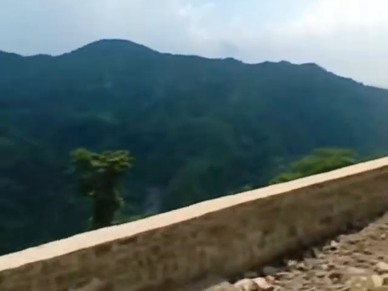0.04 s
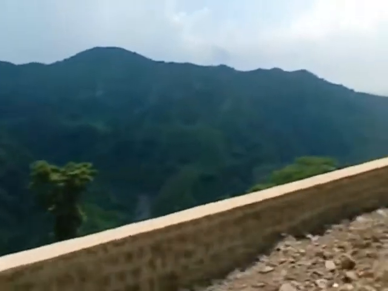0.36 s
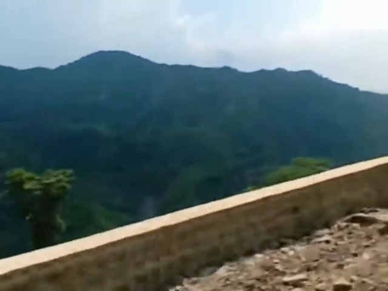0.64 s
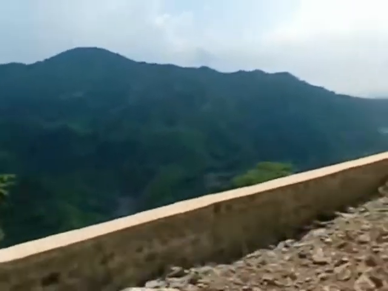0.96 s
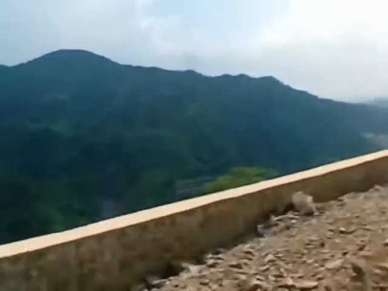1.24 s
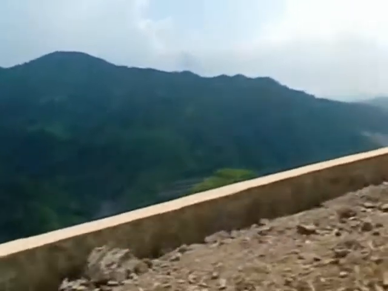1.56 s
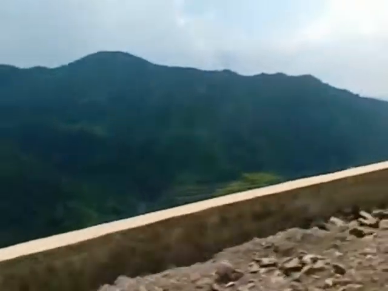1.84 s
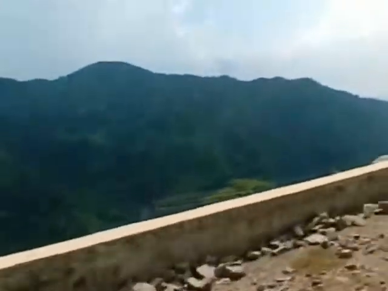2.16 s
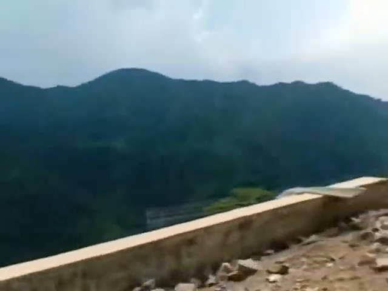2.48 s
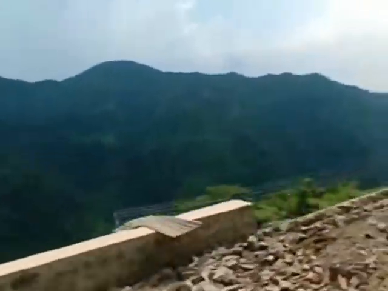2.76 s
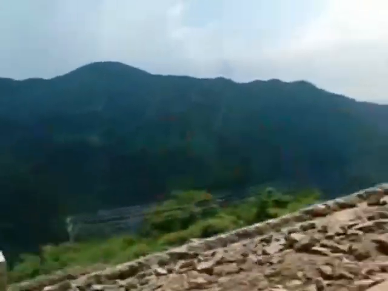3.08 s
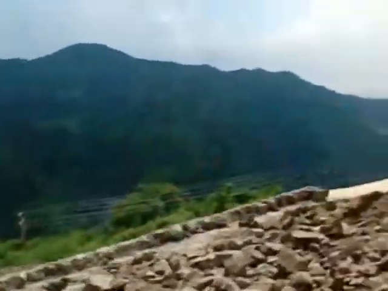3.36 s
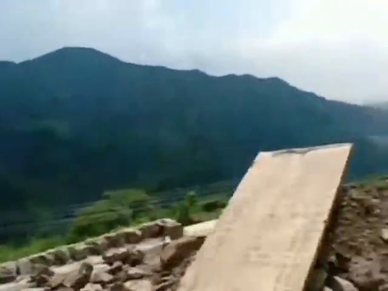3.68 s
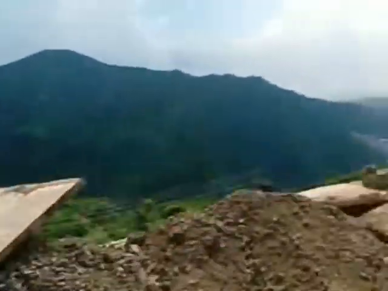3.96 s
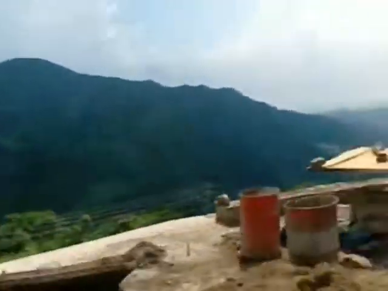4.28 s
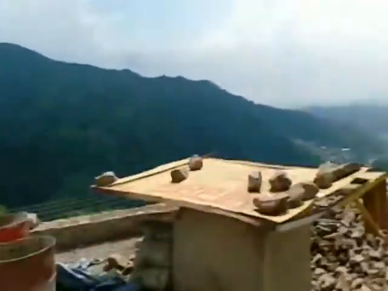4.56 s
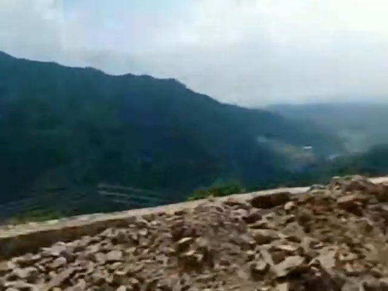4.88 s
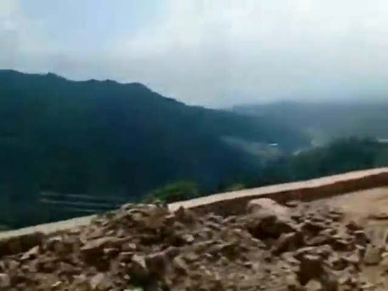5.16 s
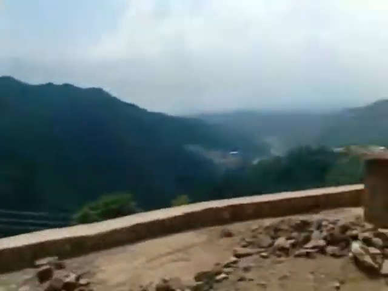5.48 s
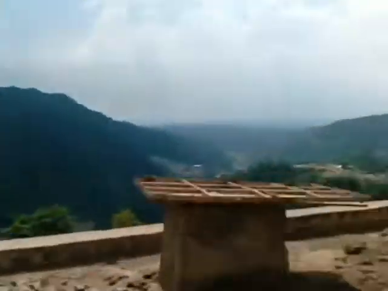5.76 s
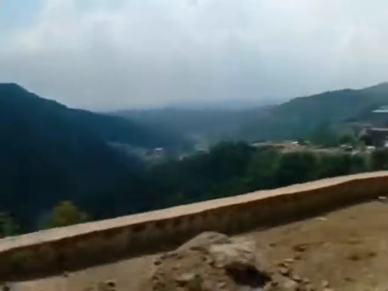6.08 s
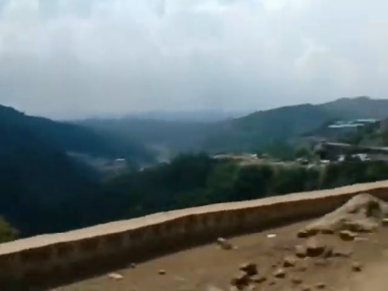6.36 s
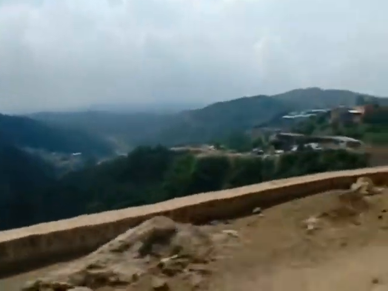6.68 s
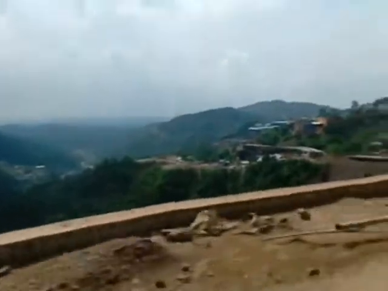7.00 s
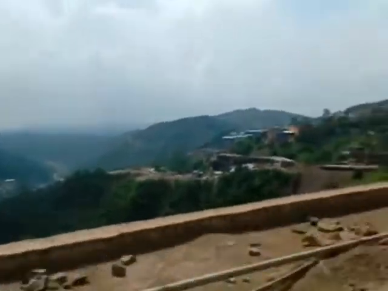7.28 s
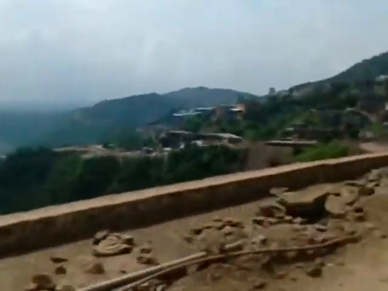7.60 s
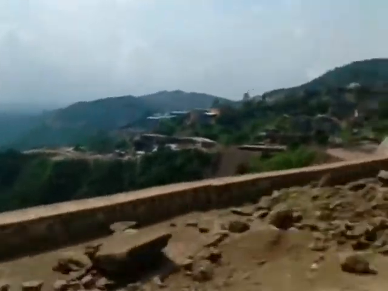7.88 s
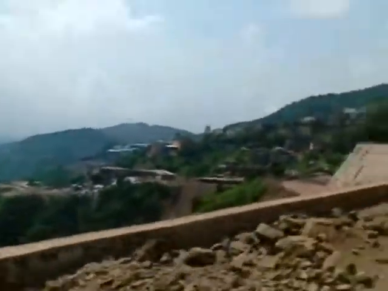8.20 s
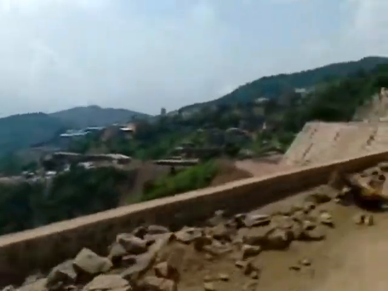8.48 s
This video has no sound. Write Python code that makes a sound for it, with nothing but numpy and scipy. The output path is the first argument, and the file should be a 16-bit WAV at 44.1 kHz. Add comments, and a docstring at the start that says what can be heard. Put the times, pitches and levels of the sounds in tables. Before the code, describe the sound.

Steady body rumble and the hiss of rolling tyres are picked up at the open window of a moving vehicle. A soft drivetrain whine sinks away at first, and occasional dull bumps follow, among faint rattling ticks. Wind keeps fluttering on the microphone, twice bursting into loud, distorted buffets later on. Near the end there is a faint whistle, two quick thuds and a sharp slap of wind.

```python
"""A mountain road, heard from a camera microphone at the open side window of a moving vehicle.
Road rumble, tyre hiss and slipstream run throughout, with faint ticks and short squeaks. A faint drivetrain
whine sinks away in the first two seconds; from 2.7 s a few bumps thud through the body. Short gusts and
single slaps buffet the microphone; near 6 s and 7.6 s the two strongest gusts overload the recorder.
The last second brings a faint steady whistle near 940 Hz, a double bump and a sharp slap."""
import sys
import numpy as np
from scipy import signal
from scipy.fft import rfft, irfft, next_fast_len
from scipy.io import wavfile
from scipy.ndimage import map_coordinates

SR = 44100
rng = np.random.default_rng(int(sys.argv[2]) if len(sys.argv) > 2 else 0)


def inscribe(sig):
    """Save sig as 16-bit PCM at rate SR to the path in sys.argv[1].

    A 1-D sig is mono; a 2-D sig holds one channel per row.
    Samples are clipped to [-1, 1] before scaling.
    """
    pcm = np.round(np.clip(np.atleast_2d(sig).T, -1, 1) * 32767)
    wavfile.write(sys.argv[1], SR, pcm.astype(np.int16))


N = 385434
TIME = np.arange(N) / SR


def amp(db):
    return 10 ** (np.asarray(db) / 20)


def unit_rms(x):
    return x / np.sqrt(np.mean(x ** 2) + 1e-20)


def curves(rows):
    """One value per sample for each column after the time."""
    time_s, *columns = np.transpose(rows)
    return [np.interp(TIME, time_s, column) for column in columns]


def wobble(per_s):
    """A smooth random curve with per_s knots a second."""
    return map_coordinates(rng.standard_normal(int(N * per_s / SR) + 4), [TIME * per_s])


def filtered(x, response):
    """x shaped by response(hz), a gain at each frequency."""
    size = next_fast_len(len(x) + 4096)
    return irfft(rfft(x, size) * response(np.fft.rfftfreq(size, 1 / SR)), size)[:len(x)]


def colour(points, hz):
    """Gain through (freq_hz, gain_db) points on a log axis, silent above the last."""
    freq_hz, gain_db = np.transpose(points)
    return amp(np.interp(np.log(hz + 1), np.log(freq_hz), gain_db, right=-120))


def noise(points):
    """Coloured noise of rms 1."""
    return unit_rms(filtered(rng.standard_normal(N), lambda hz: colour(points, hz)))


def swell(t, length_s):
    """A rounded envelope around t = 0 with steep flanks."""
    return np.exp(-np.abs(2 * t / length_s) ** 3 / 2)


def patchy(x, depth_db):
    """x at rms 1, its level wandering separately in small patches of time and frequency."""
    spectra = signal.stft(x, nperseg=1024)[2]
    patch = np.outer(np.hanning(9), np.hanning(9))
    field = signal.fftconvolve(rng.standard_normal(spectra.shape), patch, 'same')
    spectra = spectra * amp(depth_db * unit_rms(field))
    return unit_rms(signal.istft(spectra, nperseg=1024)[1][:N])


def chatter(count=300, rise_s=.0016, t60_s=.053):
    """Small loose parts tick around the cabin, each at its own pitch; higher ones are weaker."""
    t = np.arange(SR // 20) / SR
    when, pitch, size = rng.random((count, 3)).T[:, :, None]
    pitch_hz = 1500 + 1500 * pitch
    level_db = -48 + 8 * size - 4 * pitch
    envelope = amp(level_db - 60 * t / t60_s) * (1 - np.exp(-t / rise_s))
    ticks = envelope * np.sin(2 * np.pi * pitch_hz * t)
    samples = (when * N).astype(int) + np.arange(len(t))
    return np.bincount(samples.ravel(), ticks.ravel(), N)[:N]


# Faint short squeaks, and a faint steady whistle near 940 Hz in the last second:
# centre_s, length_s, pitch_hz, width_hz, level_db
SQUEAKS_AND_WHISTLE = [(0.154, .045, 2570, 100, -50), (0.918, .044, 2270, 130, -48),
                       (1.379, 0.075, 3340, 128, -52), (1.58, .06, 2500, 100, -51),
                       (2.839, 0.061, 2180, 390, -46), (5.003, 0.24, 3220, 220, -57),
                       (8.446, 0.018, 3270, 380, -50), (8.3, 0.9, 938, 23.6, -51)]


def squeaks_and_whistle():
    """Each is one narrow band of noise that swells and fades; the whistle is the longest and narrowest."""
    out = np.zeros(N)
    for centre_s, length_s, pitch_hz, width_hz, level_db in SQUEAKS_AND_WHISTLE:
        near = np.abs(TIME - centre_s) < .5
        white = rng.standard_normal(N)[near]
        band = filtered(white, lambda hz: np.exp(-((hz - pitch_hz) / width_hz) ** 2))
        out[near] += amp(level_db) * swell(TIME[near] - centre_s, length_s) * unit_rms(band)
    return out


# Drivetrain whine, faint at the window: time_s, pitch_hz, level_db
GEAR_WHINE = [(0, 308.5, -36.5), (.5, 315.8, -41), (.88, 320.2, -35), (1.3, 323, -40.5), (2.2, 309.8, -48),
              (8.74, 311.7, -59)]


def drivetrain():
    """One slightly unsteady gear tone that sinks into the rumble."""
    pitch_hz, level_db = curves(GEAR_WHINE)
    unsteady_hz = pitch_hz * (1 + .006 * wobble(14))
    phase = 2 * np.pi * np.cumsum(unsteady_hz) / SR
    return amp(level_db + 2 * wobble(16)) * unit_rms(np.sin(phase))


# Colour of the tyres on the road below the window: freq_hz, gain_db
TYRE_SPECTRUM = [(150, -30), (500, 4.5), (1000, 3), (1650, 1), (2000, -1.5), (2450, -1), (2850, -7),
                 (3300, -8), (3800, -24), (4300, -37)]
# Rise and fall of their hiss along the road: time_s, relative_db
TYRE_LEVELS = [(0.0, -50.5), (1.12, -48.5), (4.06, -51.5), (4.84, -49), (5.55, -48.5), (5.74, -47.5),
               (7.81, -50), (8.74, -48)]


def tyre_hiss(gain_db=6):
    """The rolling tyres hiss, shifting in colour with the grit."""
    relative_db, = curves(TYRE_LEVELS)
    grit = patchy(noise(TYRE_SPECTRUM), depth_db=1.6)
    return amp(relative_db + gain_db + .34 * wobble(10)) * grit


# Colour of the body's rumble, all around the microphone: freq_hz, gain_db
RUMBLE_SPECTRUM = [(25, -40.5), (60, -22), (85, -15), (120, -22), (165, 0), (220, 2.5), (320, 0), (480, -6),
                   (750, -21.5), (1300, -30), (3000, -50.5)]
# Rise and fall of the rumble along the road: time_s, relative_db
RUMBLE_LEVELS = [(0.0, -35.5), (1.02, -34.5), (1.17, -35.5), (3.29, -39.5), (4.04, -35), (4.33, -31.5),
                 (5.5, -36), (5.87, -30.5), (7.06, -34.5), (7.38, -31), (7.89, -39), (8.74, -34)]


def road_rumble(gain_db=-.68, shake_db=2):
    """The body rumbles and shakes quickly over the rough surface."""
    relative_db, = curves(RUMBLE_LEVELS)
    return amp(relative_db + gain_db + shake_db * wobble(22)) * noise(RUMBLE_SPECTRUM)


# Bumps in the road, coming up from under the vehicle: start_s, strength_db
ROAD_BUMPS = [(2.665, -21), (3.119, -19), (4.226, -14), (4.284, -12.5), (5.75, -19), (8.628, -20),
              (8.657, -19.5)]


def bumps(pitch_hz=213.7, rise_s=.0024, t60_s=.062, cushion_hz=900):
    """Each bump knocks the body through the soft tyres; it answers with one low thud that dies quickly."""
    t = np.arange(SR // 5) / SR
    envelope = (1 - np.exp(-t / rise_s)) * amp(-60 * t / t60_s)
    thud = np.gradient(envelope * np.sin(2 * np.pi * pitch_hz * t))
    start_s, strength_db = np.transpose(ROAD_BUMPS)
    blows = np.bincount(np.round(start_s * SR).astype(int), amp(strength_db), N)
    cushioned = filtered(blows, lambda hz: np.exp(-(hz / cushion_hz) ** 2))
    return signal.fftconvolve(cushioned, thud / np.abs(thud).max())[:N]


# Colour of the slipstream, right on the microphone port: freq_hz, gain_db
WIND_SPECTRUM = [(20, -43.5), (35, -33), (60, -16), (120, -13.5), (190, 1), (320, 4), (650, -1), (1000, -5),
                 (1700, -6.5), (2500, -10), (3500, -12), (4100, -23.5), (4700, -55)]


def microphone_port(pressure, bright_hz):
    """Turbulence as the microphone port hears it, rolling off above bright_hz."""
    size = 4096
    hz = np.fft.rfftfreq(size, 1 / SR)
    gain = colour(WIND_SPECTRUM, hz) / np.sqrt(1 + (hz / bright_hz) ** 5)
    cepstrum = irfft(np.log(gain + 1e-6))[:size // 2]
    cepstrum[1:] *= 2  # causal: the port rings only after a push
    impulse_response = irfft(np.exp(rfft(cepstrum, size)))
    return signal.fftconvolve(pressure, impulse_response)[:len(pressure)]


def flutter():
    """Weak eddies pass the microphone all the time, in clumps."""
    clumps = amp(3.5 * wobble(25) + 3.9 * wobble(180))
    eddies = clumps * rng.standard_normal(N)
    return amp(-40.5) * unit_rms(microphone_port(eddies, bright_hz=695))


# Single eddies slapping the microphone port: centre_s, strength_db, pitch_hz
EDDY_SLAPS = [(0.727, -20, 880), (1.0715, -24.5, 746), (2.7103, -16, 850), (3.108, -8, 910),
              (4.279, -17, 1000), (4.674, -17.5, 800), (5.8654, -8, 1040), (6.006, -8, 760),
              (6.0202, -8, 1390), (6.0732, -11, 1400), (6.076, -11, 485), (7.411, -16.5, 493),
              (8.647, -6, 666), (8.6482, -17.5, 1700)]


def slaps():
    """A lone eddy sucks, then pushes on the diaphragm; the port passes only the middle band."""
    port_band = [(30, -30), (170, 0), (2000, 0), (3400, -7), (4200, -30), (4700, -55)]  # freq_hz, gain_db
    pressure = np.zeros(N)
    for centre_s, strength_db, pitch_hz in EDDY_SLAPS:
        phase = 2 * np.pi * pitch_hz * (TIME - centre_s)
        push = np.sin(phase) / (1 + (phase / 5.4) ** 2) ** 2
        pressure += amp(strength_db) * push / push.max()
    return filtered(pressure, lambda hz: colour(port_band, hz))


def puffs(per_s=3):
    """Weak gusts at chance moments, as rows of centre_s, length_s, level_db."""
    count = int(per_s * N / SR)
    jitter, stretch, weakness = rng.uniform(-1, 1, (count, 3)).T
    centre_s = (np.arange(count) + .5 + jitter / 2) / count * N / SR
    length_s = .016 * 2 ** stretch
    level_db = -31 - 2.5 * weakness
    return np.column_stack([centre_s, length_s, level_db])


# Gusts through the open window, straight onto the microphone: centre_s, length_s, level_db
WINDOW_GUSTS = [(.485, 0.01, -30), (.736, .031, -28.5), (.852, 0.017, -28), (1.007, 0.025, -28.5),
                (1.075, 0.038, -26.5), (1.426, .015, -30.5), (1.564, 0.017, -30.5), (2.707, 0.015, -22),
                (2.912, 0.023, -35), (3.1135, 0.016, -16), (3.665, 0.075, -31.5), (3.839, 0.017, -30),
                (4.23, 0.0072, -21), (4.285, 0.036, -20), (4.472, 0.017, -21), (4.675, 0.031, -25),
                (4.718, 0.016, -25.5), (4.911, 0.013, -26.5), (5.025, 0.11, -29.5), (5.755, 0.017, -24),
                (5.9, 0.04, -12), (5.931, 0.033, -4.5), (5.977, 0.037, -8), (6.032, 0.03, -18),
                (6.076, 0.0046, -14), (6.294, 0.014, -27.5), (6.719, 0.013, -26), (7.197, 0.028, -26.5),
                (7.418, 0.028, -22.5), (7.53, 0.03, -15), (7.559, 0.035, -7.5), (7.594, .014, -8.5),
                (8.652, 0.041, -25.5)]


def gusts(ragged_db=2, front_s=.002, calm_hz=436, doubling_db=8.5):
    """Ragged bursts of turbulence with abrupt fronts; faster air carries smaller, brighter eddies."""
    out = np.zeros(N)
    turbulence = amp(ragged_db * wobble(400)) * rng.standard_normal(N)
    for centre_s, length_s, level_db in [*WINDOW_GUSTS, *puffs()]:
        near = np.abs(TIME - centre_s) < .15
        t = TIME[near] - centre_s
        front = np.clip(.5 + (t + length_s / 2) / front_s, 0, 1)
        envelope = front * swell(t, length_s)
        bright_hz = calm_hz + 1400 * 2 ** ((level_db + 10) / doubling_db)  # a -10 dB gust adds 1400 Hz
        burst = microphone_port(envelope * turbulence[near], bright_hz)
        out[near] += amp(level_db) * unit_rms(burst) * np.sqrt(np.mean(envelope ** 2))
    return out


def scene():
    """One microphone at the window: the ride behind, the wind right on top."""
    ride = road_rumble() + tyre_hiss() + bumps() + drivetrain() + squeaks_and_whistle() + chatter()
    wind = flutter() + gusts() + slaps()
    return (ride + wind)[None]


def record(dry):
    """The recorder clips hard on the strongest gusts and keeps nothing above its band limit."""
    ceiling, top_hz, edge_hz = .7, 15750, 300
    clipped = np.clip(dry[0], -ceiling, ceiling)
    return filtered(clipped, lambda hz: np.clip((top_hz - hz) / edge_hz, 0, 1))[None]


dry = scene()
out = record(dry)
inscribe(out)
```